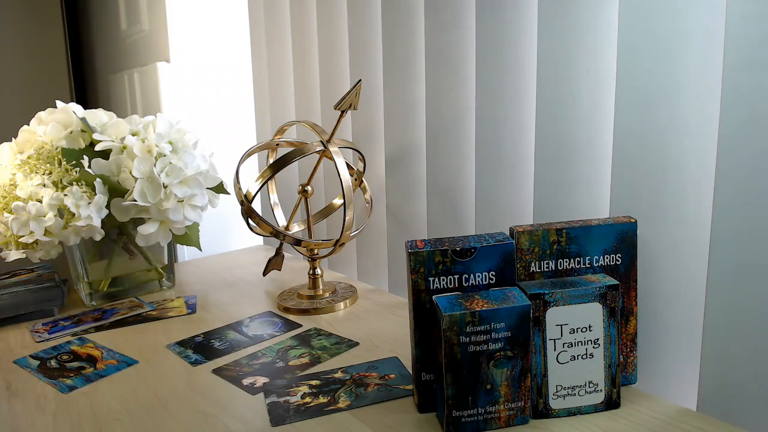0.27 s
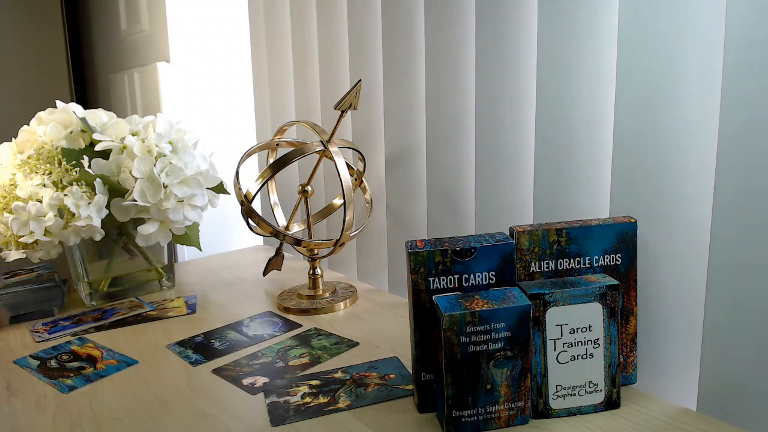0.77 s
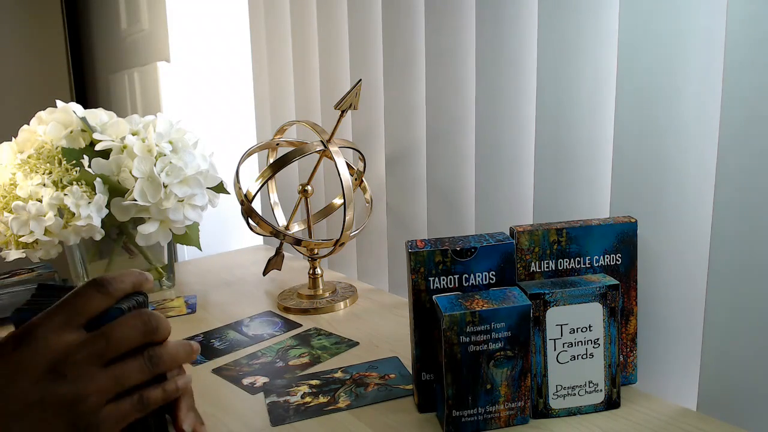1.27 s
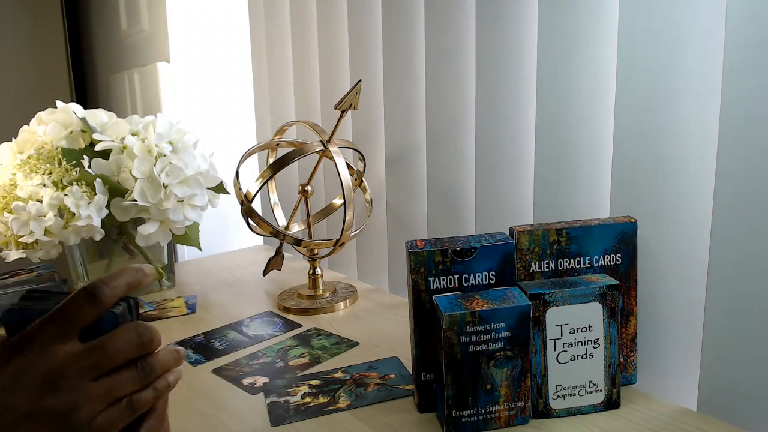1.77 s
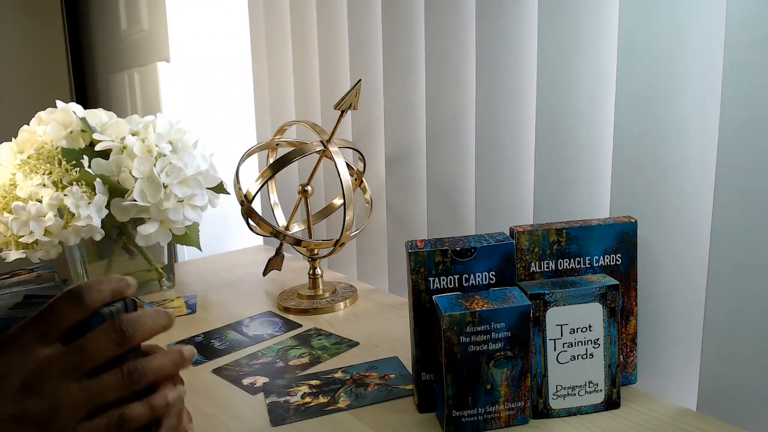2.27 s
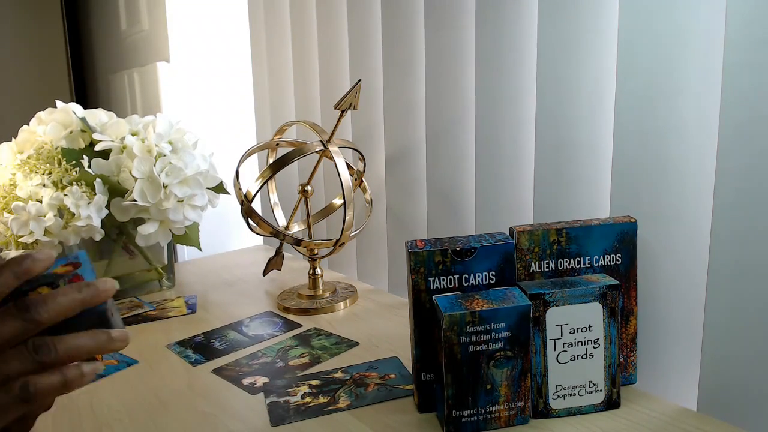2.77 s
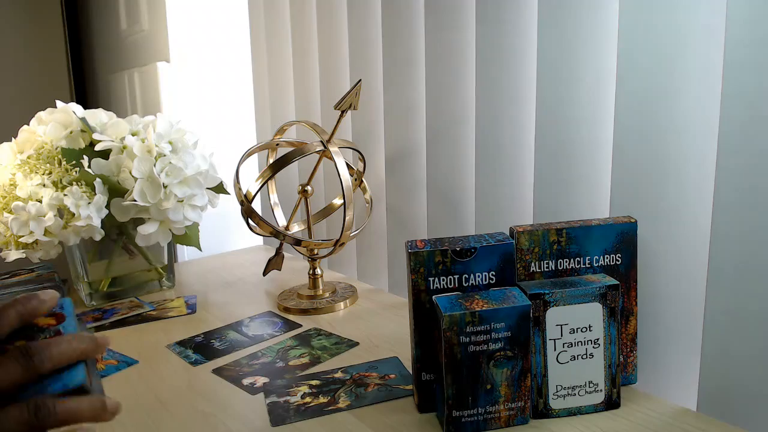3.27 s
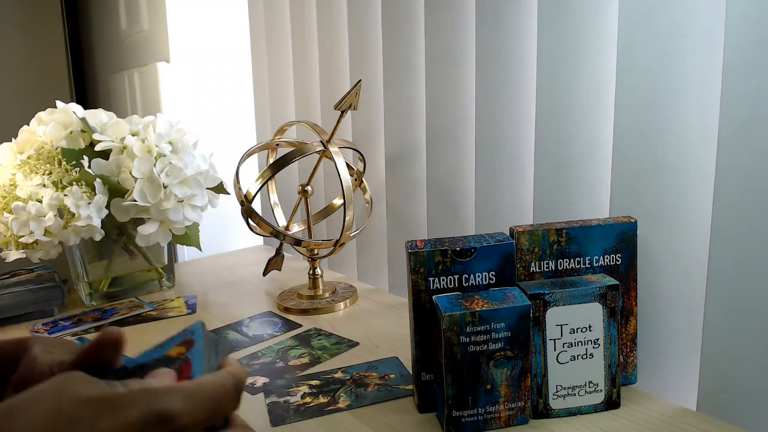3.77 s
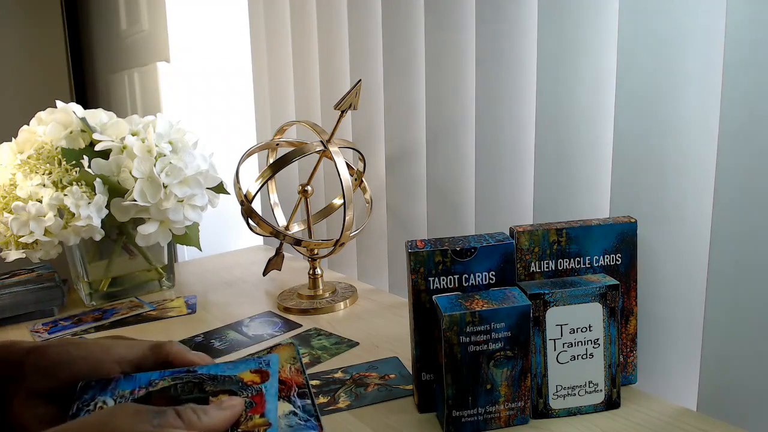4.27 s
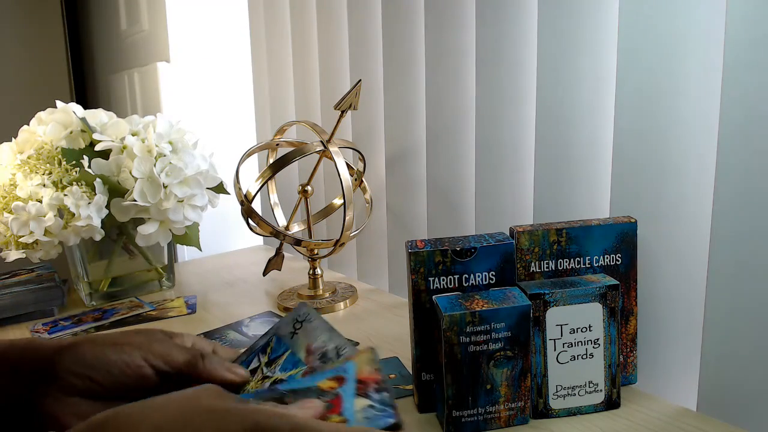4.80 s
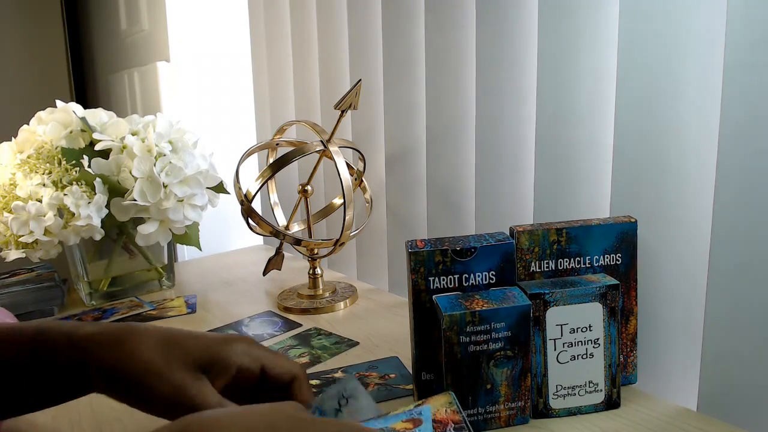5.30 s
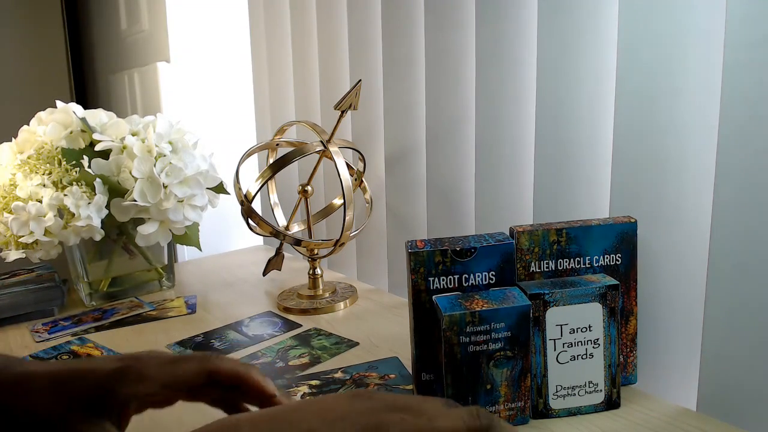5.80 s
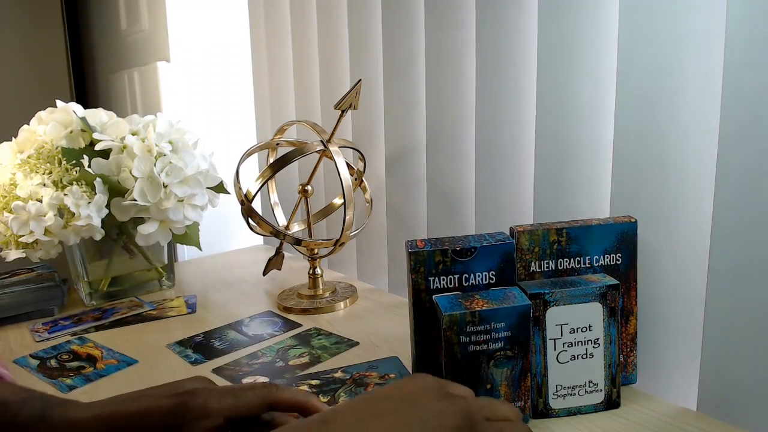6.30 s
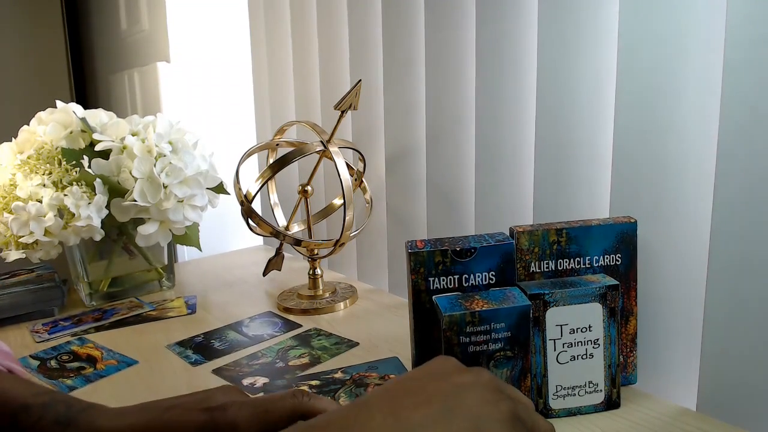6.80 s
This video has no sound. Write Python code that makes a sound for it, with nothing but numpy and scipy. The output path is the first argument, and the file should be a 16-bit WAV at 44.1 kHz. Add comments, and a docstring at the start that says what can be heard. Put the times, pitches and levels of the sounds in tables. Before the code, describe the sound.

Three sharp knocks of a deck on wood, followed by papery slides, card snaps and a hand's thump in a quiet room.

```python
"""Tarot cards on a wooden table

A deck is knocked square on the table three times. A card is then drawn off with a slide and a few snaps,
laid down with a thump of the hand and patted. Each blow makes the table and the things on it ring.
The walls of the small, quiet room answer briefly over a low ventilation rumble."""
import sys
import numpy as np
from scipy import signal
from scipy.fft import rfft, irfft
from scipy.io import wavfile
from scipy.ndimage import uniform_filter1d

SR = 44100
rng = np.random.default_rng(int(sys.argv[2]) if len(sys.argv) > 2 else 0)


def bounce(signal):
    """Save signal as a 16-bit WAV file at the path given by the first command-line argument."""
    frames = np.transpose(np.atleast_2d(signal))
    limited = np.clip(frames, -1, 1)
    pcm = np.round(limited * 32767).astype(np.int16)
    wavfile.write(sys.argv[1], SR, pcm)


N = 310860
T = np.arange(N) / SR
EVENT_T = T[:SR * 3 // 4]  # seconds since the start of one short sound


def undb(db):
    """Turn decibels into a number to multiply by."""
    return 10 ** (np.asarray(db) / 20)

def unit(x):
    """Scale a sound to an average (rms) level of 1."""
    return x / np.sqrt(np.mean(x ** 2))

def along(points, hz):
    """Read a curve of (pitch, value) points at the given pitches."""
    pitches, values = np.transpose(points)
    return np.interp(np.log(hz), np.log(pitches), values)

def bins(x):
    """The frequencies that make up the spectrum of x."""
    return np.maximum(np.fft.rfftfreq(x.shape[-1], 1 / SR), 1)

def colour(x, db):
    """Turn each frequency up or down by db."""
    n = x.shape[-1]
    cepstrum = irfft(np.log(undb(db)), n)
    cepstrum[1:n // 2] *= 2  # folded so the filter rings after a sound, not before it
    cepstrum[n // 2:] = 0
    return irfft(rfft(x) * np.exp(rfft(cepstrum)), n)

def whiten(x, width_hz):
    """Make a burst about equally strong from bass to treble."""
    size = max(int(width_hz * len(x) / SR), 1)
    power = uniform_filter1d(np.abs(rfft(x)) ** 2, size)
    return colour(x, -10 * np.log10(power + 1e-9))

def ripple(hz, spacing_hz):
    """A card's random peaks and dips, new with every grip; the spacing holds at 2000 Hz."""
    heights = rng.standard_normal(512)
    position = np.sqrt(hz * 2000) * 2 / spacing_hz
    return 1.2 * np.interp(position, np.arange(len(heights)), heights)

def spread(mid, side, wide_hz):
    """Left and right share the bass and grow unrelated above wide_hz."""
    angle = np.pi / 4 / np.hypot(1, wide_hz / bins(mid))
    mid = irfft(rfft(mid) * np.cos(angle), len(mid))
    side = irfft(rfft(side) * np.sin(angle), len(side))
    return np.array([mid + side, mid - side])

def place(x, pan_db, lag_samples=2):
    """Make stereo: the left is pan_db louder, and the right comes slightly late."""
    return np.array([x * undb(pan_db / 2), np.roll(x, lag_samples) * undb(-pan_db / 2)])

def add(track, start_s, x):
    """Mix x into the track at start_s."""
    i = int(start_s * SR)
    track[..., i:i + x.shape[-1]] += x[..., :N - i]

def fade(decay_s):
    """Die away by 60 dB in decay_s seconds."""
    return np.exp(-np.log(1000) * EVENT_T / max(decay_s, 1e-4))


# the tone of the moving air: pitch_hz, level_db
AIR_TONE = [(60, -9.5), (100, -9), (140, -3), (230, -6), (330, -13.5), (500, -18.5), (800, -17),
            (1300, -23), (2500, -27.5), (5000, -33.5), (8000, -39), (10000, -44.5), (16000, -48.5)]
# the tone of the rumble: pitch_hz, level_db
RUMBLE_TONE = [(20, -37.5), (34, -27.5), (42, -12), (48, 2.5), (53, -11), (62, -29.5), (90, -58.5)]

def ventilation():
    """A deep, slowly wavering rumble under soft air noise."""
    mid, side, low = rng.standard_normal((3, N))
    hz = bins(T)
    air = colour(spread(mid, side, wide_hz=916), along(AIR_TONE, hz))
    rumble = colour(low, along(RUMBLE_TONE, hz) - 20 * np.log10(np.maximum(hz / 90, 1)))
    return undb(-74.5) * unit(air) + undb(-59.5) * place(unit(rumble), pan_db=-2.5)


# faint electrical tones: pitch_hz, level_db
WHINE_TONES = [(5459, -109), (8010, -107)]

def whine():
    """Electronics give off thin, steady tones."""
    return sum(np.sqrt(2) * undb(db) * np.sin(2 * np.pi * hz * T) for hz, db in WHINE_TONES)


# how long the room rings: pitch_hz, decay_s
ROOM_DECAY = [(150, 0.35), (700, 0.29), (2000, 0.27), (5000, 0.19), (14000, 0.34)]

def room_echo(x, wide_hz, build_s):
    """Many reflections off near walls blur into a short tail; each octave fades at its own rate."""
    hz, tails = bins(EVENT_T), []
    centres_hz = np.geomspace(125, 16000, 8)
    build_up = 1 - np.exp(-(EVENT_T / build_s) ** 2)
    for noise in rng.standard_normal((2, len(EVENT_T))):
        tail = 0
        for centre_hz, pick in zip(centres_hz, np.eye(8)):
            octave = np.interp(np.log(hz), np.log(centres_hz), pick)
            tail += irfft(rfft(noise) * octave, len(noise)) * fade(along(ROOM_DECAY, centre_hz))
        tails.append(whiten(tail * build_up, 280))
    response = spread(*tails, wide_hz)[:, :len(EVENT_T) * 2 // 3]
    return signal.fftconvolve(x, response, axes=1)[:, :N]


# bounces off the table, boxes and vase: left_delay_ms, right_delay_ms, level_db
BOUNCES = [(1.1, 1.29, -12.5), (2.3, 2.05, -9), (3.898, 6.5, -15.5), (7.4, 11, -13)]

def with_bounces(x):
    """Nearby surfaces send back a few copies, which make the cards sound hollow and papery."""
    out = x.copy()
    for left_ms, right_ms, db in BOUNCES:
        add(out[0], left_ms / 1000, undb(db) * x[0])
        add(out[1], right_ms / 1000, undb(db) * x[1])
    return out


def friction(tone, slips_per_s, scatter_db, ripple_db):
    """Rubbing is a stream of tiny, uneven catches and slips, coloured by the bent card."""
    n, hz = len(EVENT_T), bins(EVENT_T)
    slips = (rng.random(n) < slips_per_s / SR) * rng.standard_normal(n)
    slips *= undb(scatter_db * np.minimum(rng.exponential(size=n), 4))
    return unit(colour(slips, along(tone, hz) + ripple_db * ripple(hz, spacing_hz=130.1)))


# the tone of a shaking card: pitch_hz, level_db
FLUTTER_TONE = [(150, -29), (340, 7.5), (480, -11.5), (640, 0), (760, 1.5), (900, -12.5), (1150, -1.5),
                (1700, -22), (3000, -48)]

def flutter(scatter_db, ripple_db):
    """Rubbing shakes the whole card, which gives a low, papery sound."""
    return friction(FLUTTER_TONE, slips_per_s=2200, scatter_db=scatter_db, ripple_db=ripple_db)


# fingers gripping the deck: start_s, length_s, level_db, pitch_hz, overtone_hz
GRIPS = [(0.877, .085, -74.5, 1414, 3670), (0.975, 0.14, -79, 1754, 3750)]

def squeaks(width_hz, overtone_db, flutter_db):
    """Skin sticks and slips on the deck: two unsteady tones and the flutter of the card."""
    out, hz = np.zeros(N), bins(EVENT_T)
    for start_s, length_s, db, pitch_hz, overtone_hz in GRIPS:
        peaks_db = [-20 * np.log10(1 + ((hz - f) / width_hz) ** 2) for f in (pitch_hz, overtone_hz)]
        low, high = (unit(colour(rng.standard_normal(len(EVENT_T)), peak)) for peak in peaks_db)
        sheet = flutter(scatter_db=-2.5, ripple_db=3)
        grip = np.sqrt(np.abs(np.sin(np.pi * np.minimum(EVENT_T / length_s, 1))))
        add(out, start_s, undb(db) * grip * (low + undb(overtone_db) * high + undb(flutter_db) * sheet))
    return place(out, pan_db=-5.5)


# the tone of a card's rasping edge: pitch_hz, level_db
RASP_TONE = [(600, -57.5), (1100, 0), (1500, -8.5), (1950, 2.5), (2300, -2), (2900, -6.5), (3400, -4),
             (4000, -29), (6000, -32)]
# the tone of its hissing face: pitch_hz, level_db
HISS_TONE = [(2000, -28), (3600, 1.5), (4400, 7), (5500, 5), (6900, 1), (8200, -7.5), (11000, -9.5),
             (15500, -25)]
# a card sliding on card or skin: fastest_s, rise_s, fall_s, rasp_db, flutter_vs_rasp_db, hiss_vs_rasp_db
CARD_STROKES = [ (0.12, .035, .025, -95, -1, 16), (0.31, 0.056, 0.061, -84.5, 9.5, -2),
                (0.54, 0.051, 0.035, -73.5, 6.5, -4.5), (3.748, 0.078, 0.046, -68, 2, -4),
                (4.144, 0.053, 0.038, -81, 6.5, -0.5), (4.229, .03, 0.024, -73, -3, -5),
                (4.455, .045, 0.11, -74.5, -4.5, -5.5), (4.67, 0.062, 0.046, -75, 8.5, -11.5),
                (4.783, 0.017, 0.019, -42, 3.5, -4), (4.824, 0.036, .058, -40.5, -11, -18),
                (4.965, 0.072, 0.051, -44.5, -9.5, -12.5), (5.01, 0.02, 0.078, -59.5, -2.5, -16),
                (5.145, 0.037, 0.053, -62.5, -12, -9.5), (5.194, 0.019, 0.028, -55, 6, -23),
                (5.24, 0.031, 0.02, -38, -15.5, -8.5), (5.358, 0.02, 0.016, -48, -6, -10),
                (5.41, 0.023, 0.024, -61.5, 9.5, -11), (5.574, 0.027, 0.043, -56.5, 4, -8),
                (5.735, 0.074, 0.048, -64, 11.5, -7), (6.222, 0.025, 0.024, -76, -3, 2.5),
                (6.501, 0.051, 0.08, -85, 10, -4)]

def slides():
    """Each stroke swells and fades: the edge rasps, the sheet flutters and the glossy face hisses."""
    swell_db, roundness = 12.5, 1.42
    hiss_growth, flutter_growth = 1.11, 0.83  # dB for each dB of rasp: faster is brighter
    out = np.zeros(N)
    for fastest_s, rise_s, fall_s, db, flutter_db, hiss_db in CARD_STROKES:
        start_s = max(fastest_s - .25, 0)
        t = start_s + EVENT_T - fastest_s
        speed_db = -swell_db * np.abs(np.where(t < 0, t / rise_s, t / fall_s)) ** roundness
        edge = undb(speed_db) * friction(RASP_TONE, slips_per_s=5000, scatter_db=2.2, ripple_db=3)
        sheet = undb(flutter_growth * speed_db + flutter_db) * flutter(scatter_db=0.5, ripple_db=6.5)
        face = friction(HISS_TONE, slips_per_s=7000, scatter_db=3, ripple_db=1.2)
        face *= undb(hiss_growth * speed_db + hiss_db)
        add(out, start_s, undb(db) * (edge + sheet + face))
    return place(out, pan_db=-3.5)


# card edges snapping free: start_s, peak_db, pitch_hz, crack_vs_tone_db
CARD_SNAPS = [(0.678, -45.5, 1830, -25), (4.764, -27, 2320, -2), (4.789, -10.5, 2800, 5),
              (4.8331, -17.5, 2460, -7), (4.8577, -31, 2260, -22), (4.982, -29.5, 2130, -13),
              (5.178, -33.5, 2050, -3), (5.185, -35.5, 2120, -16), (5.2208, -26.5, 1780, -12),
              (5.548, -42, 1980, -1), (5.6152, -20.5, 1360, -14), (5.621, -20.5, 1566, -13.5)]

def snaps():
    """A bent card springs back with a brief tone and a dry crack, shorter the harder it snaps."""
    usual_cycles, usual_db = 13, -20  # a snap at this level dies away in this many cycles
    damping_db = 92  # a snap this much harder rings a tenth as long
    crack_tone = [(100, -1), (400, 8), (1200, 15), (6000, 16.5), (15000, -14)]  # pitch_hz, level_db
    out = np.zeros(N)
    for start_s, db, hz, crack_db in CARD_SNAPS:
        decay = fade(usual_cycles / hz * 10 ** ((usual_db - db) / damping_db))
        crack = whiten(decay * rng.standard_normal(len(EVENT_T)), 1650)
        crack = colour(crack, along(crack_tone, bins(crack)))
        snap = decay * np.sin(2 * np.pi * hz * EVENT_T) + undb(crack_db) * crack / np.abs(crack).max()
        add(out, start_s, undb(db) * snap[:len(EVENT_T) // 2] / np.abs(snap).max())
    return place(out, pan_db=-1, lag_samples=3)


# the tone of the deck's edge meeting wood: pitch_hz, level_db
CLACK_TONE = [(100, -33.5), (340, -3), (490, -7.5), (760, -2.5), (1100, -5.5), (1600, -12), (2700, -19),
              (3600, -20), (5500, -26.5), (8000, -33), (15000, -39)]

def clack(tilt_db, decay_s, peak_hz, peak_db):
    """A landing makes a burst of noise, boosted at peak_hz where the deck or hand rings."""
    hz = bins(EVENT_T)
    octaves = np.log2(np.maximum(hz, 500) / 1000)
    db = along(CLACK_TONE, hz) + tilt_db * octaves  # more tilt is brighter
    db += peak_db * np.exp(-(np.log2(hz / peak_hz) / 0.22) ** 2 / 2)
    db += 1.8 * ripple(hz, spacing_hz=172) * np.minimum(hz / 1500, 1)
    strike = fade(decay_s) * (1 - np.exp(-EVENT_T / .0008))
    mid, side = (colour(whiten(strike * rng.standard_normal(len(EVENT_T)), 300), db) for _ in range(2))
    burst = unit(spread(mid, side, wide_hz=1900)) * np.sqrt(np.mean(fade(decay_s) ** 2))
    return burst[:, :len(EVENT_T) // 2]

def blow(start_s, frame_db, top_db, top_tilt_db, contact):
    """One hit for table_blows to play: how hard it shakes the wood, and the sound of the contact."""
    return start_s, frame_db, top_db, top_tilt_db, contact

def touch(start_s, db, contact):
    """A light blow that barely moves the table."""
    return blow(start_s, frame_db=db - 18, top_db=db - 14, top_tilt_db=0, contact=undb(db) * contact)


# light taps: start_s, level_db, tilt_db_per_octave, peak_hz, peak_db
LIGHT_TAPS = [ (0.662, -52.5, 0, 1650, 11), (1.794, -64, 0, 425, 39), (3.243, -75.5, 3.5, 5010, 6),
              (3.750, -55.5, 0.5, 1486, 14), (3.934, -58.5, 2.5, 1180, 6), (4.672, -54, -10.5, 217, 22),
              (5.335, -45, -4.5, 342, 15), (5.344, -37, 1.5, 341, 25), (5.396, -55.5, 0, 1100, 0),
              (5.604, -44, 0.5, 1300, 16), (6.042, -44, -2, 416, 13), (6.085, -56.5, -0.5, 500, 3),
              (6.874, -62, 3.5, 350, 30)]

def taps():
    """Fingers and single cards touch the deck or table."""
    decay_s = 0.125
    return [touch(start_s, db, clack(tilt_db, decay_s, peak_hz, peak_db))
            for start_s, db, tilt_db, peak_hz, peak_db in LIGHT_TAPS]


def thump(start_s, palm_lag_s):
    """The card slaps flat under the hand, which rocks the table; the soft palm lands just after."""
    slap = undb(-19) * clack(tilt_db=-0.5, decay_s=0.0095, peak_hz=1450, peak_db=6.5)
    palm = clack(tilt_db=-6.5, decay_s=0.14, peak_hz=321, peak_db=19.5)
    return [blow(start_s, frame_db=-19, top_db=-34.5, top_tilt_db=-10, contact=slap),
            touch(start_s + palm_lag_s, db=-32, contact=palm)]


# the deck knocked square: start_s, clack_db, top_db, top_tilt_db_per_octave, decay_s, peak_hz, peak_db,
# corner_early_s, loose_late_s, loose_vs_clack_db, loose_peak_hz
DECK_KNOCKS = [ (1.0622, -15, -22.5, -8, .06, 1151, 8, 0.0047, .021, -1.5, 2400),
               (1.4648, -5.5, -14, 1, .045, 2650, 11, 0.01, 0.008, -10, 1030),
               (2.201, -9, -12, -3, .095, 1152, 3, .005, 0.0083, -13, 2200)]

def knocks():
    """One corner of the deck touches, the whole edge strikes, then the loose cards drop after it."""
    out = []
    for (start_s, db, top_db, top_tilt_db, decay_s, peak_hz, peak_db,
         early_s, late_s, loose_db, loose_hz) in DECK_KNOCKS:
        corner = clack(tilt_db=-5, decay_s=.06, peak_hz=1151.4, peak_db=3.5)
        edge = clack(tilt_db=-1.92, decay_s=decay_s, peak_hz=peak_hz, peak_db=peak_db)
        loose = clack(tilt_db=-2.5, decay_s=.035, peak_hz=loose_hz, peak_db=10)
        out += [touch(start_s - early_s, db - 12, corner),
                blow(start_s, top_db - 11, top_db, top_tilt_db, undb(db) * edge),
                touch(start_s + late_s, db + loose_db, loose)]
    return out


def ring(notes, decay_s, rise_s):
    """An object's own notes, one row each, build up as a blow spreads through it and then fade."""
    hz, db = np.transpose(notes)
    gain = (-1) ** np.arange(len(hz)) * undb(db)  # every other wave starts downward
    waves = np.sin(2 * np.pi * np.outer(hz, EVENT_T))
    return gain[:, None] * waves * fade(decay_s) * (1 - np.exp(-EVENT_T / rise_s))


# the room's deep boom and the table rocking on its legs: pitch_hz, level_db
FRAME_NOTES = [(48.4, -3.5), (91.5, -0.5)]
# the ringing table top, and from 1490 Hz up the deck itself: pitch_hz, level_db
TOP_NOTES = [(128, -5), (143, -1), (188, -2.5), (245, -6), (305, -7.5), (346, -2.5), (404, -5), (425, -1),
             (452, -11.5), (500, -14.5), (552, -10.5), (625, -14), (670, -14), (722, -8.5), (777, -6.5),
             (903, -11.5), (996, -17), (1066, -8.5), (1130, -13), (1297, -18), (1490, -25), (1715, -23.5),
             (1888, -23.5), (1965, -22.5), (2326, -24.5), (2525, -27), (2756, -26.5)]
# boxes and ornaments on the table: pitch_hz, level_vs_top_db
ORNAMENT_NOTES = [(506, -31), (650, -28), (765, -28)]

def table_blows(blows):
    """Each blow clacks, shakes the frame and rings the top and the things on it."""
    wood, clacks = np.zeros(N), np.zeros((2, N))
    frame = ring(FRAME_NOTES, decay_s=.34, rise_s=0.012).sum(axis=0)
    top_waves = ring(TOP_NOTES, decay_s=.195, rise_s=0.0038)
    ornaments = ring(ORNAMENT_NOTES, decay_s=.45, rise_s=0.018).sum(axis=0)
    octaves = np.log2(np.transpose(TOP_NOTES)[0] / 300)
    for start_s, frame_db, top_db, top_tilt_db, contact in blows:
        top = undb(top_db + top_tilt_db * octaves) @ top_waves  # harder contact reaches higher notes
        add(wood, start_s, undb(frame_db) * frame + top + undb(top_db) * ornaments)
        add(clacks, start_s, contact)
    return place(wood, pan_db=2, lag_samples=3), clacks


def scene():
    """The table and cards, heard close up in the quiet room."""
    wood, clacks = table_blows(knocks() + taps() + thump(start_s=5.618, palm_lag_s=0.0052))
    cards = with_bounces(snaps() + slides() + squeaks(width_hz=55, overtone_db=-8.5, flutter_db=6.5))
    to_walls = undb(-7.5) * clacks + undb(-13.5) * (cards + wood)
    echo = room_echo(to_walls, wide_hz=596, build_s=0.0078)
    return wood + clacks + cards + echo + ventilation() + whine()

def record(dry):
    """Round off the loudest peaks and cut the highest treble."""
    rounded = dry / (1 + dry ** 6) ** (1 / 6)
    cutoff_hz = 15850
    return signal.sosfilt(signal.ellip(10, .2, 80, cutoff_hz, fs=SR, output="sos"), rounded)


dry = scene()
out = record(dry)
bounce(out)
```